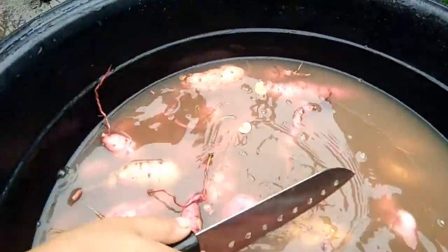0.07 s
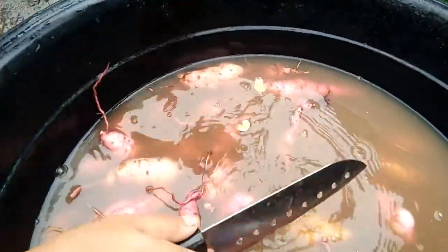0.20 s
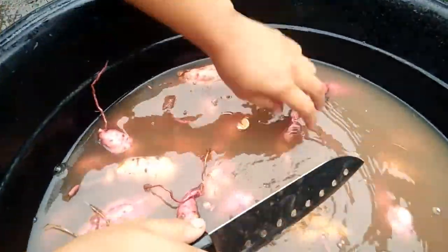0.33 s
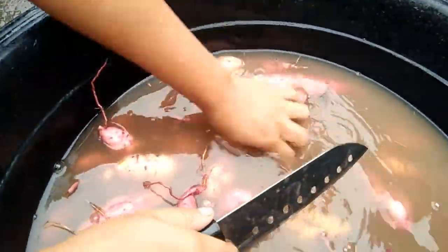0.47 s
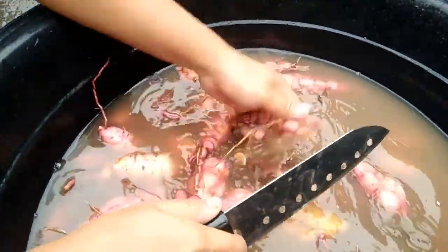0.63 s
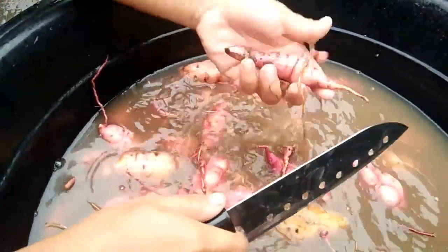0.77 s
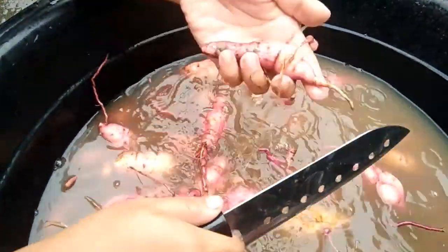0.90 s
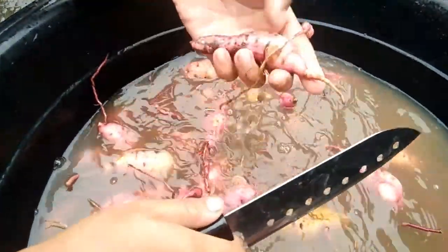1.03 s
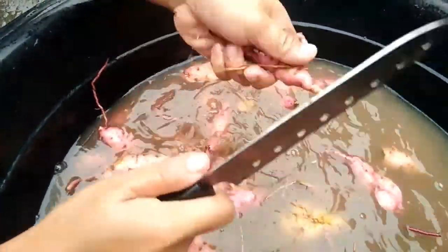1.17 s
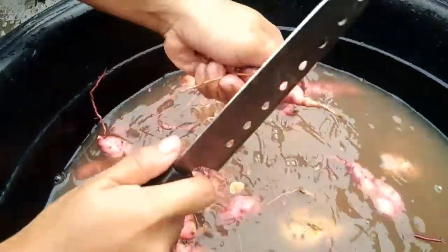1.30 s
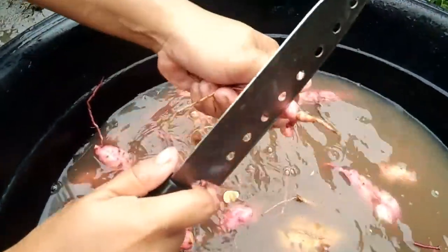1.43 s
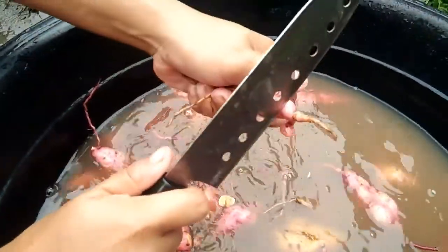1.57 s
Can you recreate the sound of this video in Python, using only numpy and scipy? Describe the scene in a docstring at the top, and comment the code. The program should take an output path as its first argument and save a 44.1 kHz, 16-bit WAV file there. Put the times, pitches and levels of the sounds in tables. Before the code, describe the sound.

Water splashing in a plastic tub, heard close outdoors. Faint high tones die away at the start over low hum and hiss. From 0.2 to 0.45 seconds, soft hollow knocks boom. At about 0.63 a bright, bubbly splash bursts out, running off until 0.85, then crisp drips until 1.05. Smaller plops and spatter follow at 1.18-1.38, and a last drip at 1.53. The background dips when quiet.

```python
"""Outdoors in a garden, a hand lifts a root out of a plastic tub of water. Knocks make the tub boom,
water runs off in bubbles and spray, and single drops plop back. Faint high tones die away at the start.
Struck things and bubbles are dying tones; hum, hiss, slosh and spray are filtered noise.
The recorder's noise gate turns everything down, hum and hiss of the garden too, when the water is quiet."""
import sys
import numpy as np
from scipy import signal
from scipy.io import wavfile
from scipy.ndimage import uniform_filter1d, minimum_filter1d

SR = 44100
rng = np.random.default_rng(int(sys.argv[2]) if len(sys.argv) > 2 else 0)


def master_out(mix):
    """Clip the mix to full scale and print it as 16-bit PCM to the path in sys.argv[1]."""
    frames = np.transpose(np.atleast_2d(mix))
    ceiling = np.clip(frames, -1, 1)
    pcm = np.round(ceiling * 32767).astype(np.int16)
    wavfile.write(sys.argv[1], SR, pcm)


def gain_from_db(level_db):
    """Turn a decibel level (scalar or array-like) into a linear amplitude factor."""
    decades = np.asarray(level_db, float) / 20
    return 10 ** decades


N = 72765  # length in samples, 1.65 s


def rms_one(x):
    """Scales a sound to an average (rms) strength of 1."""
    return x / np.sqrt(np.mean(x ** 2) + 1e-20)


def band(x, low_hz, high_hz):
    """Keeps the part of a sound between two frequencies."""
    edges = [low_hz, min(high_hz, 0.45 * SR)]
    return signal.sosfilt(signal.butter(2, edges, "band", fs=SR, output="sos"), x)


def narrow_band(x, low_hz, high_hz):
    """The same band filter twice, for steeper sides."""
    return band(band(x, low_hz, high_hz), low_hz, high_hz)


def ring(clicks, hz, t60):
    """A resonator: a click of height 1 sets a dying sine of height 1 ringing."""
    r, w = gain_from_db(-60 / (t60 * SR)), 2 * np.pi * hz / SR
    return signal.lfilter([0, np.sin(w)], [1, -2 * r * np.cos(w), r * r], clicks + 1e-18)


def add(out, s, piece):
    """Mixes a short sound into a longer one, starting at s seconds."""
    i = int(s * SR)
    out[i:i + len(piece)] += piece[:N - i]


def dying(t60, rise_s):
    """Times and loudness curve: a short rise, then a fall of 60 dB in t60 seconds."""
    t = np.arange(int(max(t60, 0.004) * SR)) / SR
    return t, (1 - np.exp(-t / rise_s)) * gain_from_db(-60 * t / max(t60, 0.004))


def drift(rate):
    """Smoothed noise of rms 1 that wanders at about this rate in Hz."""
    r = np.exp(-2 * np.pi * rate / SR)
    noise = rng.standard_normal(N + 8000)
    return rms_one(signal.lfilter([1], [1, -2 * r, r * r], noise)[8000:])


def in_time(rows):
    """Joins (time, level) points into a gain curve, silent outside them."""
    s, db = np.transpose(rows)
    return gain_from_db(np.interp(np.arange(N) / SR, s, db, -120, -120))


# tone colour of the garden's hum and hiss, before its overall level is set: (f/Hz, level/dB)
GARDEN_SPECTRUM = [(28, -28), (60, 2), (110, 2.5), (250, 3.5), (330, -8), (420, -19), (800, -12.5),
                   (1500, -18.5), (2600, -16), (3300, -22.5), (5000, -28), (9000, -22), (15500, -42.5)]
GARDEN_DB, GARDEN_FLICKER_DB = -56.5, 3.5


def garden():
    """Hum and hiss: third-octave bands of noise, each flickering a little."""
    edges = 28 * 2 ** np.arange(0, 9.3, 1 / 3)
    white = rng.standard_normal((2, N + 4000))
    hz, db = np.transpose(GARDEN_SPECTRUM)
    flicker = [drift(17.3) for _ in range(4)]
    out = np.zeros(N)
    for k, (low, high) in enumerate(zip(edges, edges[1:])):
        middle = np.log(low * high) / 2
        level_db = np.interp(middle, np.log(hz), db) + GARDEN_FLICKER_DB * flicker[k % 4]
        out += gain_from_db(level_db) * band(white[k % 2], low, high)[4000:]  # skip the filter's start
    return gain_from_db(GARDEN_DB) * rms_one(out)


def crickets():
    """A thin, steady band of high hiss, perhaps insects."""
    return gain_from_db(-73.5) * rms_one(narrow_band(rng.standard_normal(N), 10100, 11000))


# faint high tones at the start: (starting f/Hz, level/dB relative to HIGH_TONES_DB, t60/s)
HIGH_TONES = [(4700, -1, 0.094), (5814, 8.5, 0.058), (9335, 10, 0.086), (10200, 10, 0.014),
              (12000, 7, 0.098)]
HIGH_TONES_DB = -66
HIGH_TONES_CLIMB = 0.035  # share by which the pitch climbs over the t60


def high_tones():
    """Faint high tones die away at the start, climbing slightly in pitch."""
    out = np.zeros(N)
    for hz, db, t60 in HIGH_TONES:
        t, shape = dying(t60, 1 / SR)
        tone = np.sin(2 * np.pi * hz * (t + HIGH_TONES_CLIMB * t ** 2 / (2 * t60)))
        add(out, 0, gain_from_db(HIGH_TONES_DB + db) * shape * tone)
    return out


def grains(per_s, cycles, span_hz):
    """Clumped random clicks dealt to 20 small resonators that die within so many cycles; rms 1."""
    sizes = gain_from_db(3.9 * np.minimum(rng.exponential(1, N), 4)) * rng.choice([-1, 1], N)
    born = rng.random(N) < per_s * gain_from_db(4 * drift(30)) / SR
    dealt = rng.integers(0, 20, N)
    out = np.zeros(N)
    for k, hz in enumerate(np.geomspace(*span_hz, 20)):
        out += ring(sizes * born * (dealt == k), hz, cycles / hz)
    return rms_one(out)


# rise and fall of the water running off hand and root: (t/s, level/dB)
RUNOFF_FLOW = [(0.561, -61), (0.65, -51), (0.778, -48), (0.816, -49.5), (0.866, -54.5), (0.959, -58),
               (1.016, -108), (1.206, -60.5), (1.302, -61), (1.416, -67), (1.44, -56)]
# rise and fall of the slosh of the whole body of water: (t/s, level/dB)
SLOSH_FLOW = [(.56, -61.5), (.66, -43.5), (.8, -49.5), (1.05, -57), (1.08, -100), (1.18, -63), (1.23, -53),
              (1.41, -57), (1.45, -63)]


def runoff():
    """Bubbles and fizz, both crowds of tiny rings, share one flow; low noise is the slosh below them."""
    bubbles = gain_from_db(-4.5) * grains(1300, 13, (1360, 3560))
    fizz = gain_from_db(-8) * grains(2000, 14, (4200, 14200))
    slosh = rms_one(band(rng.standard_normal(N), 57.3, 207.4)) * gain_from_db(2.2 * drift(27))
    return in_time(RUNOFF_FLOW) * (bubbles + fizz) + in_time(SLOSH_FLOW) * slosh


# bursts of spray: (t/s, level/dB, centre f/Hz, t60/s)
SPRAY_BURSTS = [(.553, -49, 9800, 0.027), (0.569, -51, 7640, 0.079), (0.593, -46, 6600, 0.018),
                (.638, -28, 6500, 0.018), (0.639, -32, 9850, 0.013), (0.648, -37, 9650, 0.027),
                (0.6517, -32, 6900, 0.02), (0.6664, -30.5, 7600, 0.025), (0.673, -34, 9350, 0.018),
                (0.6767, -34, 7700, 0.023), (0.6841, -37.5, 5440, 0.024), (0.688, -33, 9200, 0.017),
                (0.74, -42, 10300, 0.05), (.755, -39, 8300, 0.03), (0.76, -35.5, 4900, 0.021),
                (0.764, -32, 10200, 0.017), (0.7718, -35.5, 9940, 0.05), (0.784, -42, 5300, 0.024),
                (0.7928, -25.5, 8420, 0.038), (0.799, -26.5, 9900, 0.026), (0.805, -33.5, 10000, 0.041),
                (0.8065, -37, 6240, 0.017), (0.827, -34, 9600, 0.015), (0.835, -32, 9300, 0.013),
                (.839, -30, 9800, 0.013), (0.9041, -33.5, 5100, 0.016), (0.9159, -24, 9400, 0.0065),
                (0.9213, -21, 7680, 0.011), (0.929, -35.5, 9500, 0.034), (0.936, -31, 9500, 0.03),
                (0.9518, -33.5, 7250, 0.026), (0.954, -32, 4700, .02), (0.9925, -25.5, 9070, 0.023),
                (1.036, -38.5, 8400, 0.017), (1.044, -41, 9600, 0.033), (1.06, -44, 6240, 0.019),
                (1.182, -39.5, 10100, 0.016), (1.191, -40, 5330, 0.023), (1.194, -42, 7260, 0.03),
                (1.217, -35.5, 11300, 0.02), (1.229, -33, 9200, .02), (1.227, -27, 12300, 0.0085),
                (1.2308, -38.5, 6600, 0.042), (1.2307, -23.5, 9500, 0.0084), (1.26, -44.5, 10900, 0.039),
                (1.289, -46, 8900, 0.042), (1.304, -42.5, 10600, 0.025), (1.3357, -35.5, 6200, 0.029),
                (1.34, -41.5, 4200, 0.024), (1.3563, -37, 6700, 0.027), (1.366, -33.5, 12100, 0.019),
                (1.374, -36.5, 10900, 0.023), (1.379, -37, 6650, 0.02), (1.3797, -47, 8400, 0.081),
                (1.5293, -37, 6620, 0.02), (1.619, -46.5, 7860, 0.013)]
SPRAY_OCTAVES, SPRAY_BROAD_DB = 0.5, 0  # width of the strong band; level of the wide hiss around it


def sprays():
    """Short dying hisses, each strongest round its centre."""
    out, noise = np.zeros(N), rng.standard_normal(N + SR)
    for s, db, hz, t60 in SPRAY_BURSTS:
        shape, i = dying(t60, 0.00079)[1], int(s * SR)
        white = noise[i:i + len(shape)]
        half_width = 2 ** (SPRAY_OCTAVES / 2)
        core = rms_one(narrow_band(white, hz / half_width, hz * half_width))
        broad = gain_from_db(SPRAY_BROAD_DB) * band(white, 1970, 20800)
        add(out, s, gain_from_db(db - 7.5) * shape * (core + broad))  # 7.5 dB leaves room for the noise's peaks
    return out


# bubbles bursting at the churned surface: (t/s, level/dB, starting f/Hz, t60/s)
BUBBLE_BURSTS = [(0.341, -41, 834, 0.024), (0.626, -42, 1190, 0.038), (0.637, -23.5, 1390, 0.019),
                 (0.643, -18, 2274, 0.015), (0.645, -40, 3340, 0.032), (0.649, -40, 1240, 0.02),
                 (0.652, -41, 3000, 0.035), (0.674, -29.5, 2490, 0.024), (.677, -51.5, 1260, 0.061),
                 (0.7039, -28.5, 2234, 0.024), (0.714, -52.5, 1550, 0.11), (0.757, -30, 1280, 0.018),
                 (0.764, -26, 2320, 0.014), (0.768, -33.5, 1245, 0.024), (0.7795, -29, 3000, 0.022),
                 (0.806, -36, 2616, 0.036), (0.8308, -24, 2770, 0.016), (0.833, -36, 2120, 0.0215),
                 (0.838, -29.5, 2436, 0.025), (.847, -39, 2575, 0.041), (1.299, -40, 3000, 0.015),
                 (1.34, -45.5, 3200, 0.025), (1.359, -38, 2833, 0.026), (1.367, -35.5, 3370, 0.015),
                 (1.373, -27.5, 2460, 0.011), (1.382, -34, 1420, 0.016)]
BURST_RISE_S, BURST_CLIMB = 0.002, 0.644  # swell; share by which the pitch climbs over the t60
BURST_ROUGH, BURST_SPLASH_DB = 0.7, -12  # raggedness of the tone; noise thrown with it


def bursts():
    """A neck of water opens: a ragged tone swells, climbs and dies amid a little splash."""
    out, ragged, noise = np.zeros(N), drift(410), rng.standard_normal(N)
    for s, db, hz, t60 in BUBBLE_BURSTS:
        t, shape = dying(t60, BURST_RISE_S)
        near = slice(int(s * SR), int(s * SR) + len(t))
        tone = np.sin(2 * np.pi * hz * (t + BURST_CLIMB * t ** 2 / (2 * t60)))
        tone = tone * (1 + BURST_ROUGH * ragged[near])
        splash = gain_from_db(BURST_SPLASH_DB) * rms_one(band(noise[near], hz * 0.8, hz * 1.6))
        swell = 2 * t / (t + BURST_RISE_S)
        add(out, s, gain_from_db(db) * shape * swell * (tone + splash))
    return out


# drops heard one by one: (t/s, level/dB, f/Hz, t60/s)
SINGLE_DROPS = [(.3985, -61, 1860, 0.071), (0.596, -37, 2594, 0.031), (.598, -51, 750, 0.15),
                (.626, -38.5, 574, 0.044), (.68, -46.5, 765, 0.088), (.682, -45, 353, 0.23),
                (0.689, -37.5, 2850, 0.048), (0.6939, -33.5, 2100, 0.035), (.735, -49, 555, 0.19),
                (0.7485, -28, 2660, 0.012), (0.7543, -33, 2624, 0.088), (0.7629, -36.5, 2240, 0.11),
                (0.781, -35.5, 1790, 0.07), (0.7943, -33.5, 1440, 0.029), (0.853, -45, 4850, 0.023),
                (0.8885, -44.5, 2420, 0.041), (0.905, -34.5, 2870, 0.06), (0.922, -38.5, 3340, 0.032),
                (0.928, -46.5, 2650, 0.16), (0.9482, -33.5, 2857, 0.052), (0.9926, -29.5, 2704, 0.036),
                (1.087, -55, 2970, 0.018), (1.109, -51.5, 2900, 0.036), (1.1815, -39, 2490, 0.015),
                (1.1824, -38, 1670, 0.0083), (1.1829, -31.5, 1155, 0.077), (1.227, -38.5, 1474, 0.066),
                (1.2439, -32, 1976, 0.04), (1.2431, -36.5, 3000, 0.016), (1.308, -54, 2920, .03),
                (1.355, -57.5, 725, 0.29), (1.368, -35.5, 1737, 0.018), (1.5308, -30.5, 2620, 0.0096),
                (1.535, -44, 1274, 0.026)]
DROP_RISE_S, DROP_TICK_DB = 0.0004, -11.5
DROP_GLIDE = 0.064  # share the pitch climbs over the t60 at 3 kHz, less for big (low) bubbles
DROP_SETTLE, DROP_SETTLE_S = 0.12, 0.0032  # pitch starts high by this share; time to settle
# wobble at 3 kHz; time it takes to set in; share of it that the pitch follows
DROP_ROUGH, DROP_STEADY_S, DROP_WAVER = 0.55, 0.006, 0.07


def drops():
    """A tick, then the trapped bubble: a dying sine that settles, climbs in pitch and starts to wobble."""
    out, wobble = np.zeros(N), drift(220)
    pitch_wobble = wobble[::-1]  # played backwards, so pitch and loudness wobble apart
    tick = rms_one(band(rng.standard_normal(N), 1190, 3100))
    for s, db, hz, t60 in SINGLE_DROPS:
        t, shape = dying(t60, DROP_RISE_S)
        near = slice(int(s * SR), int(s * SR) + len(t))
        small = (hz / 3000) ** 2  # small bubbles sound high
        pitch = hz * (1 + DROP_GLIDE * small * t / t60 + DROP_SETTLE * np.exp(-t / DROP_SETTLE_S))
        rough = DROP_ROUGH * small * (1 - np.exp(-(t / DROP_STEADY_S) ** 2))
        pitch = pitch * (1 + DROP_WAVER * rough * pitch_wobble[near])
        tone = np.sin(2 * np.pi * np.cumsum(pitch) / SR) * (1 + rough * wobble[near])
        dying_tick = gain_from_db(DROP_TICK_DB - 60 * t / 0.0097) * tick[near]
        add(out, s, gain_from_db(db) * (shape * tone + dying_tick))
    return out


# knocks on the tub: (t/s, push level/dB, slap level/dB)
TUB_KNOCKS = [(0.214, -21.5, -29.5), (0.219, -20.5, -36.5), (0.226, -42.5, -61), (0.232, -18, -63),
              (0.256, -31.5, -70), (0.265, -28, -49.5), (0.271, -28, -83), (0.28, -24, -43.5),
              (0.2875, -28.5, -95), (0.309, -32.5, -52), (0.34, -31, -72), (0.356, -34.5, -86),
              (0.39, -38, -68), (0.395, -37, -45), (0.417, -57, -55.5), (0.453, -48, -56),
              (0.479, -66, -59)]
# tones of the tub wall: (f/Hz, level/dB, t60/s)
TUB_TONES = [(107.4, -14, 0.097), (188, -15.5, 0.12), (275, -21, 0.17), (271.3, -3, 0.11),
             (302.9, -10.5, 0.138), (410, -23, 0.039), (561, -10.5, 0.032), (865.5, -15, 0.09),
             (960, -10, 0.026), (1370, -11.5, 0.019)]
PUSH_HZ = (122, 450)  # band of the soft push
SLAP_T60_S, SLAP_HZ = 0.05, (675, 3000)
SLAP_TOP_DB, SLAP_RINGS_DB = -18.5, -19.5  # white noise in the slap; how much the slap rings the wall


def tub():
    """Soft pushes and noisy slaps of water ring the tones of the wall; the slaps are heard directly too."""
    pushes, slaps = np.zeros(N), np.zeros(N)
    noise = rng.standard_normal(N)
    for s, push_db, slap_db in TUB_KNOCKS:
        pushes[int(s * SR)] = gain_from_db(push_db)
        add(slaps, s, gain_from_db(slap_db) * dying(SLAP_T60_S, 0.00041)[1])
    slaps = slaps * (rms_one(narrow_band(noise, *SLAP_HZ)) + gain_from_db(SLAP_TOP_DB) * noise)
    drive = band(pushes, *PUSH_HZ) + gain_from_db(SLAP_RINGS_DB) * slaps
    return slaps + sum(gain_from_db(db) * ring(drive, hz, t60) for hz, db, t60 in TUB_TONES)


def scene():
    """All the layers together, in one channel."""
    background = garden() + crickets() + high_tones()
    water = runoff() + sprays() + bursts() + drops()
    return (background + water + tub())[None]


GATE_KEY_HZ, GATE_SENSE_S = 560, 0.0093  # the gate listens above this pitch, averaging over this time
GATE_OPEN_DB, GATE_SLOPE, GATE_DEPTH_DB = -50, 1, 12.5  # threshold; dB down per dB below it; most it turns down
GATE_HOLD_S, GATE_FALL_DB_PER_S, GATE_MOVE_S = 0.03, 895, 0.0006
GATE_START_DB = -40  # level the gate takes as heard just before the start


def gate(x):
    """Gain follows the held level of the upper sound: open above a threshold, turned down below it."""
    key = signal.sosfilt(signal.butter(2, GATE_KEY_HZ, "high", fs=SR, output="sos"), x)
    sense, hold = int(GATE_SENSE_S * SR), int(GATE_HOLD_S * SR)
    power = uniform_filter1d(key ** 2, sense, origin=int(GATE_SENSE_S * SR / 4))  # mostly the past
    level = 10 * np.log10(power + 1e-12)
    start = np.maximum(level[:hold // 2], GATE_START_DB)
    level = np.concatenate([np.full(hold, GATE_START_DB), start, level[hold // 2:]])
    # highest level within the past hold time, which then may only fall so fast
    held = -minimum_filter1d(-level, hold, origin=(hold - 1) // 2)[hold:]
    fall = GATE_FALL_DB_PER_S * np.arange(N) / SR
    held = np.maximum.accumulate(held + fall) - fall
    gain_db = np.clip(GATE_SLOPE * (held - GATE_OPEN_DB), -GATE_DEPTH_DB, 0)
    r = np.exp(-1 / (GATE_MOVE_S * SR))
    return x * gain_from_db(signal.lfilter([1 - r], [1, -r], gain_db))


def band_limit(x):
    """A steep low-pass at the top of the band."""
    return signal.sosfilt(signal.butter(12, 15800, fs=SR, output="sos"), x)


def record(dry):
    """Microphone with little deep bass and a step down in the top treble, noise gate, faint hiss, top cut."""
    x = signal.sosfilt(signal.butter(2, 41, "high", fs=SR, output="sos"), dry[0])
    body = signal.sosfiltfilt(signal.butter(6, 11300, fs=SR, output="sos"), x)
    top = gain_from_db(-10.5) * (x - body)
    hiss = gain_from_db(-87) * rms_one(band(rng.standard_normal(N), 3000, 12000))  # the recorder's own, after the gate
    x = gate(body + top) + hiss
    x = signal.sosfilt(signal.cheby2(12, 70, 16500, fs=SR, output="sos"), x)
    return band_limit(x[None])


dry = scene()
out = record(dry)
master_out(out)
```